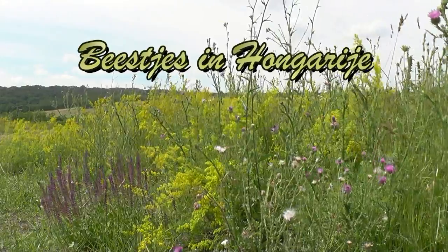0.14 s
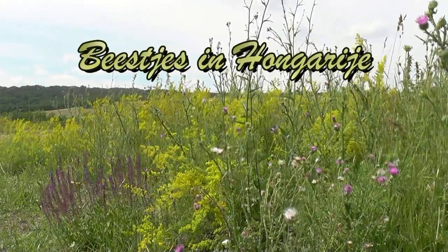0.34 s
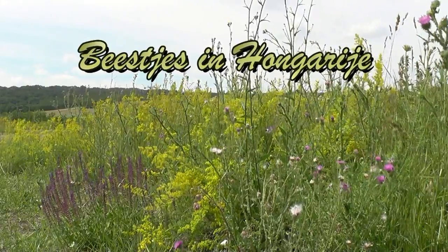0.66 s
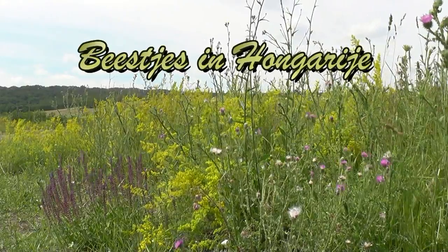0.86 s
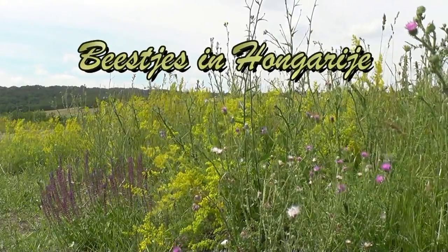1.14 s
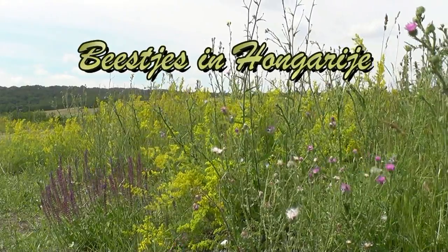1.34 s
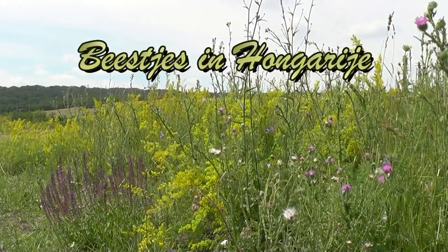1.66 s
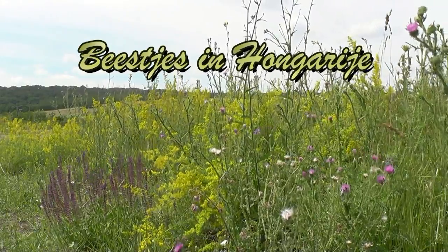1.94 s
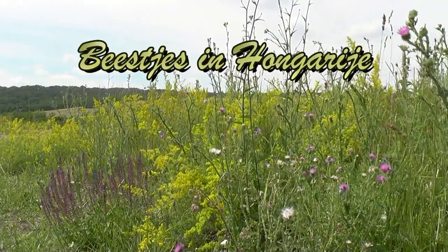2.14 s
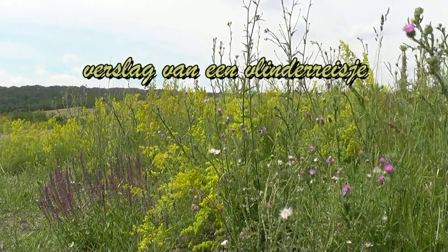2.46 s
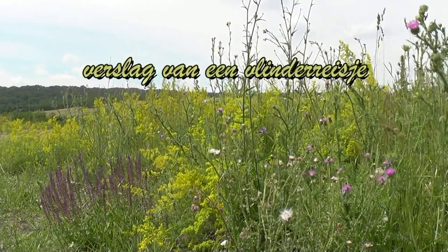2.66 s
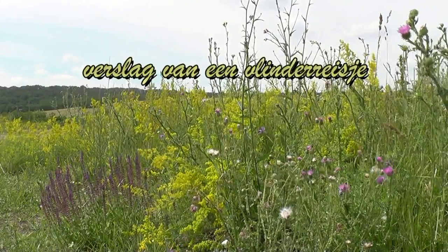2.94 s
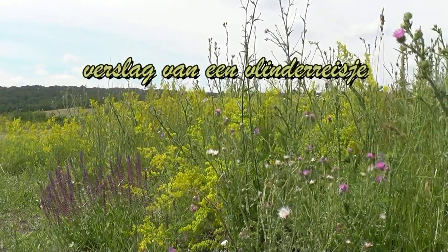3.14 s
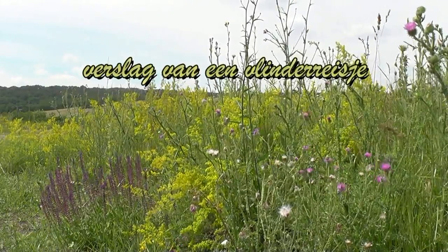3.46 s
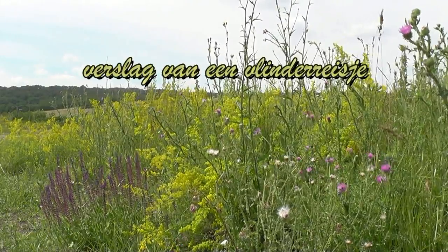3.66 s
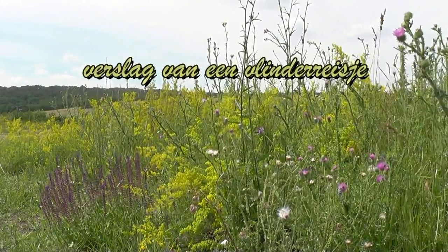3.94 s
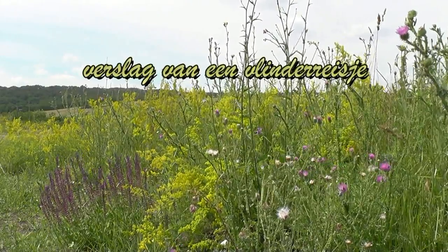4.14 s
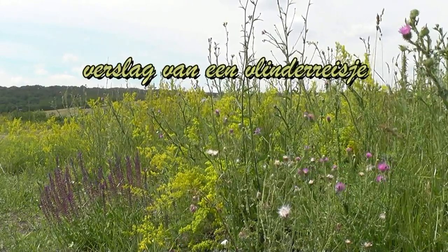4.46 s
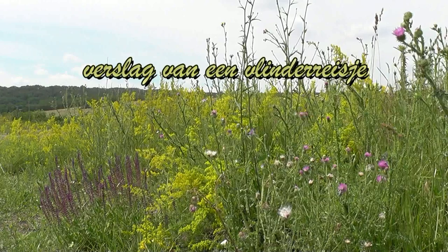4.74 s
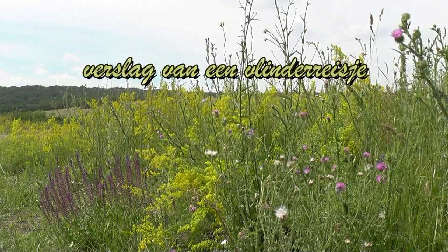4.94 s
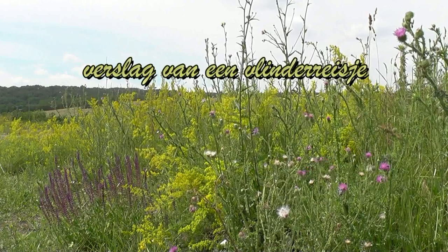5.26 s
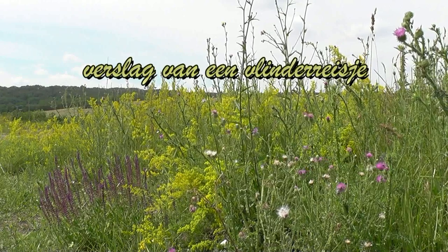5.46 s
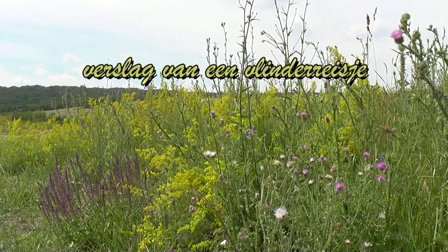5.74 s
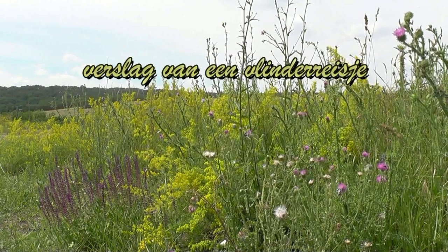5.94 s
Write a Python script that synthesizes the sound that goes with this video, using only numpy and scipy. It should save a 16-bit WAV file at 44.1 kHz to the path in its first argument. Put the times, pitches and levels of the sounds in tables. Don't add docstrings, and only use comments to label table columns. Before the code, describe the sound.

A single frog close by croaks six times in an open meadow, each croak a half-second rattle of round, low-mid pulses with thin reedy breaths between. Far birds whistle, warble and rasp, softened by echoes from trees. A soft airy hush lies underneath. The third croak starts weak and swells; the last is faint as everything fades. Three tiny clicks occur.

```python
import sys
import numpy as np
from scipy import signal
from scipy.io import wavfile
from scipy.ndimage import uniform_filter1d

SR = 44100
rng = np.random.default_rng(int(sys.argv[2]) if len(sys.argv) > 2 else 0)


def transcribe(u):
    v = np.clip(np.atleast_2d(u).T, -1, 1)
    q = np.round(v * 32767).astype(np.int16)
    wavfile.write(sys.argv[1], SR, q)


def volts_from_decibels(level):
    exponent = np.asarray(level, float) / 20
    return 10 ** exponent


N = 268622


def evened(x):
    return x / np.sqrt(np.mean(x ** 2) + 1e-20)


def read(points, hz):
    f, value = np.transpose(points)
    return np.interp(np.log(hz + 1), np.log(f + 1), value)


def add(mix, start_s, sound):
    part = mix[round(start_s * SR):][:len(sound)]
    part += sound[:len(part)]


def wander(seconds):
    size = max(int(seconds * SR), 2)
    noise = rng.standard_normal(N)
    return evened(uniform_filter1d(uniform_filter1d(noise, size), size))


def glide(length_s, start_hz, middle_hz, end_hz):
    u = np.linspace(-1, 1, round(length_s * SR))
    slope = (end_hz - start_hz) / 2
    bend = (start_hz + end_hz) / 2 - middle_hz
    return 2 * np.pi * np.cumsum(middle_hz + u * slope + u ** 2 * bend) / SR


# f/Hz, t60/s
MEADOW_T60 = [(300, 0.96), (700, 1.4), (3000, .8), (8000, 0.46)]


def meadow(x):
    taps = np.zeros(SR)
    slots = np.arange(1500, SR - 20, 20)
    signs = rng.choice([-1., 1.], len(slots))
    taps[slots + rng.integers(0, 20, len(slots))] = signs
    hz, t, z = signal.stft(taps, SR, nperseg=256)
    decay = volts_from_decibels(-60 * t / read(MEADOW_T60, hz)[:, None])
    tail = signal.istft(z * decay, SR, nperseg=256)[1]
    return signal.fftconvolve(x, tail / np.linalg.norm(tail))[:N]


# f/Hz, density/(dB per Hz)
HUSH_SPECTRUM = [(15, -70), (25, -34), (59, -30.5), (129, -32), (194, -26.5), (311, -17.5), (389, -5),
                 (522, -6), (653, -6), (876, -7), (1610, -21), (2360, -20.5), (3380, -18), (4050, -19),
                 (5420, -27.5), (7050, -48), (11900, -120)]
# t/s, 1.3-2.3 kHz level/dB, extra above 5 kHz/dB
HUSH_LEVEL = [(0.0, -63, 3), (1.37, -67, 1), (1.54, -66, 0), (1.78, -67.5, 1), (2.29, -66.5, 1.5),
              (2.42, -66, 3), (3.21, -68, -0.5), (4.14, -68, 3.5), (4.49, -66, 0.5), (4.7, -69.5, 6),
              (4.85, -71, 1.5), (5.21, -73, 1.5), (5.61, -80.5, 8), (5.97, -88, 0), (6.09, -98, 0)]


def hush():
    frames, hz = N // 256 + 5, np.fft.rfftfreq(1024, 1 / SR)
    a, b, patches = rng.standard_normal((frames, 513, 3)).T
    patches = evened(uniform_filter1d(uniform_filter1d(patches, 10, 0), 12, 1))
    frame_s = np.arange(frames) * 256 / SR
    s, db, top_db = np.transpose(HUSH_LEVEL)
    level_db = np.interp(frame_s, s, db)
    top_db = np.interp(frame_s, s, top_db)
    spectrum_db = read(HUSH_SPECTRUM, hz)
    depth_db = read([(80, 6), (300, 2.3), (5000, 3.6), (8000, 3)], hz)
    top_share = read([(4200, 0), (6000, 1)], hz)
    field_db = spectrum_db[:, None] + depth_db[:, None] * patches + top_share[:, None] * top_db
    reference = np.linalg.norm(volts_from_decibels(spectrum_db)[(hz > 1300) & (hz < 2300)])
    z = (a + 1j * b) * volts_from_decibels(field_db + level_db) / reference
    return .61 * signal.istft(z, nperseg=1024, noverlap=768)[1][:N]


# t/s, song centre f/Hz
SONG_PITCH = [(0, 3615), (.5, 3500), (.53, 4200), (.64, 4287), (.7, 3490), (.78, 3109), (.85, 3516),
              (.9, 4077), (.96, 3800), (1.0, 3153), (1.1, 3404), (1.2, 3709), (1.26, 3950), (1.33, 3471),
              (1.42, 3750), (1.5, 3500), (1.53, 3077), (1.64, 3850), (1.69, 3222), (1.81, 3950),
              (1.84, 2944), (1.9, 3250), (2.0, 3090), (2.12, 3600), (2.25, 3090), (2.68, 3193), (2.9, 3600),
              (3.0, 4700), (3.25, 4480), (3.6, 3700), (3.85, 3810), (4.2, 3625), (4.6, 4427), (5.0, 4283),
              (5.3, 3626), (6.09, 4124)]
# t/s, level/dB
SONG_LEVEL = [(0.0, -54.5), (0.1, -57), (0.25, -62.5), (0.42, -65), (0.57, -58), (0.95, -54.5), (1.24, -54),
              (1.36, -56.5), (1.97, -58.5), (2.31, -64), (2.54, -71), (2.93, -67), (3.29, -75), (3.6, -71),
              (3.75, -61), (4.02, -68), (4.39, -69.5), (4.85, -71.5), (5.31, -69.5), (5.53, -79),
              (5.78, -75.5), (5.95, -81.5), (6.09, -89)]


def warbler():
    t = np.arange(N) / SR
    waver = 0.057 * wander(.008) + .04 * wander(0.0013)
    pitch_hz = np.interp(t, *np.transpose(SONG_PITCH)) * (1 + waver)
    syllables = volts_from_decibels(4.1 * wander(0.025))
    song = np.sin(2 * np.pi * np.cumsum(pitch_hz) / SR) * syllables
    heard = evened(song) + .6 * evened(meadow(song))
    level_db = np.interp(t, *np.transpose(SONG_LEVEL)) + 0.5
    return volts_from_decibels(level_db) * evened(heard)


# t/s, length/s, start f/Hz, middle f/Hz, end f/Hz, level/dB
BIRD_NOTES = [(0.134, .05, 3900, 4000, 1800, -60.5), (.18, .07, 3600, 4200, 4400, -61.5),
              (.335, 0.048, 4090, 3640, 3300, -56.5), (.39, .05, 3420, 4150, 2900, -59),
              (0.431, 0.067, 3570, 3430, 3500, -52.5), (0.587, 0.05, 2900, 3020, 3000, -54.5),
              (.73, .03, 2980, 3100, 2600, -52), (.86, 0.031, 3070, 2730, 2750, -56.5),
              (1.0, 0.032, 2930, 2770, 2720, -57.5), (1.13, .04, 3000, 2650, 2600, -51.5),
              (1.26, 0.055, 3054, 2830, 2750, -48), (1.4, 0.04, 3020, 2760, 2720, -50),
              (1.519, 0.053, 2940, 2730, 2720, -48), (1.66, .04, 2940, 2730, 2720, -48.5),
              (1.78, 0.053, 2824, 2750, 2720, -49.5), (1.917, 0.05, 2910, 2700, 2800, -47.5),
              (.79, 0.066, 4480, 4400, 4500, -60.5), (.86, .08, 4150, 4250, 4150, -54),
              (1.18, 0.083, 4050, 4000, 3400, -51.5), (1.36, 0.019, 3400, 3500, 3600, -62),
              (1.79, .05, 4800, 5600, 5150, -73.5), (2.113, .095, 6640, 5200, 4300, -61.5),
              (2.246, 0.11, 6640, 6050, 5300, -66.5), (2.338, 0.041, 3595, 2390, 3400, -52.5),
              (2.229, .05, 1277, 1320, 1200, -57), (2.33, 0.077, 1220, 1140, 920, -61),
              (2.514, .05, 1088, 1120, 1050, -63), (2.761, 0.12, 5330, 4500, 4600, -60.5),
              (2.885, .07, 6300, 7300, 3800, -76), (2.876, 0.052, 3670, 3800, 3800, -62.5),
              (2.982, 0.1, 5220, 4750, 4600, -62), (3.489, 0.035, 5900, 4570, 2400, -58),
              (3.611, 0.049, 5890, 4400, 3850, -58), (3.726, 0.043, 5770, 4700, 3950, -58.5),
              (3.83, 0.027, 5710, 5160, 5500, -58), (3.729, .16, 8100, 8050, 7950, -75),
              (3.953, 0.1, 6400, 6500, 8000, -71.5), (3.96, 0.058, 8000, 7660, 8000, -68),
              (4.036, 0.034, 7840, 7200, 10000, -62.5), (4.119, 0.099, 2490, 2840, 3900, -66),
              (4.202, 0.082, 2440, 3300, 6700, -68), (4.299, .085, 3300, 3050, 2800, -61.5),
              (4.46, .25, 7650, 7600, 7800, -87), (4.775, .012, 5100, 5700, 4100, -67.5),
              (4.755, 0.14, 3500, 3200, 4000, -63.5), (4.778, .1, 7700, 7400, 7100, -82),
              (4.88, .16, 8400, 8350, 8100, -78), (4.91, 0.02, 5300, 5350, 5350, -69.5),
              (4.94, .02, 4770, 4600, 6800, -67), (4.96, .08, 7600, 7200, 6500, -83),
              (5.111, 0.042, 2420, 2700, 6500, -61.5), (5.114, 0.023, 3200, 3300, 3500, -58),
              (5.225, 0.048, 2500, 3200, 4400, -67.5), (5.218, 0.028, 3140, 3800, 7200, -57),
              (5.338, 0.044, 2440, 2800, 4800, -65), (5.338, 0.027, 2880, 4100, 4000, -70),
              (5.4, 0.14, 4210, 4400, 3700, -72.5), (5.456, 0.098, 3500, 3500, 3000, -68),
              (5.604, 0.086, 4150, 4500, 2300, -75.5), (5.64, 0.12, 3400, 3400, 3000, -77.5),
              (5.71, 0.062, 1087, 1160, 1090, -70), (5.799, 0.13, 4050, 4200, 4250, -75),
              (5.91, .05, 3820, 3700, 1800, -76)]
TRILL_TIMES = [5.585, 5.655, 5.726, 5.801, 5.87, 5.94, 6.009]


def bird_notes():
    out = np.zeros(N)
    flicks = [(s, .018, 5600, 5000, 4200, -76 - 14 * (s - TRILL_TIMES[0])) for s in TRILL_TIMES]
    for s, length_s, *hz, db in BIRD_NOTES + flicks:
        phase = glide(length_s, *hz)
        add(out, s, volts_from_decibels(db) * np.sin(phase) * signal.windows.tukey(len(phase), .6))
    return out


# t/s, length/s, low f/Hz, high f/Hz, level/dB
BIRD_RASPS = [(.54, 0.064, 4000, 6350, -64.5), (3.93, .03, 5010, 7340, -80),
              (4.14, 0.039, 4800, 7400, -65.5), (4.22, 0.046, 4740, 7230, -70),
              (4.32, 0.044, 4470, 7300, -66), (4.41, 0.049, 4570, 7300, -75),
              (4.51, 0.065, 4410, 7000, -67.5), (4.59, 0.05, 4260, 6330, -71),
              (5.11, 0.072, 2490, 7600, -66), (5.22, .07, 2466, 7330, -65.5), (5.34, .06, 2526, 7230, -68)]


def bird_rasps():
    out = np.zeros(N)
    for s, length_s, low_hz, high_hz, db in BIRD_RASPS:
        hiss = rng.standard_normal(round(length_s * SR))
        buzz = hiss * (1 + 0.52 * np.sin(glide(length_s, 150, 190, 150)))
        throat = signal.butter(3, [low_hz, high_hz], "bandpass", fs=SR, output="sos")
        rasp = evened(signal.sosfilt(throat, buzz))
        add(out, s, volts_from_decibels(db) * rasp * signal.windows.tukey(len(hiss), .6))
    return out


def birds():
    out = (bird_notes() + bird_rasps()) * volts_from_decibels(2.0 * wander(0.0026))
    return out + volts_from_decibels(-11.5) * meadow(out)


# multiple of pitch, level/dB
REED_ORDERS = [(2, -25.5), (3, 2), (4, 1.5), (5, -19)]


def wheeze(length_s, *hz):
    phase = glide(length_s, *hz)
    reed = sum(volts_from_decibels(db) * np.sin(k * phase + k ** 2) for k, db in REED_ORDERS)
    return reed * signal.windows.tukey(len(phase), .7)


# crest t/s, crest level/dB, crest f/Hz
SAC_PULSES = [(0.1473, -20.0, 568), (0.1826, -18.8, 568), (0.2176, -19.2, 560), (0.2519, -19.8, 556),
              (0.2874, -20.1, 555), (0.323, -19.1, 550), (0.3582, -19.2, 552), (0.3953, -20.3, 548),
              (0.4307, -19.7, 547), (0.4661, -19.8, 547), (0.503, -20.0, 541), (0.5392, -19.2, 549),
              (0.5745, -20.1, 546), (0.6102, -21.0, 538), (0.6458, -20.6, 534), (0.6821, -21.7, 533),
              (0.7141, -29.2, 480), (1.1055, -20.3, 568), (1.1377, -19.2, 578), (1.1705, -19.3, 559),
              (1.2039, -19.7, 560), (1.2372, -19.7, 556), (1.2717, -20.1, 554), (1.3066, -20.3, 554),
              (1.3419, -21.5, 533), (1.3777, -22.0, 540), (1.4141, -22.5, 533), (1.4495, -22.3, 531),
              (1.486, -23.2, 517), (1.5203, -23.6, 512), (1.5563, -23.9, 516), (1.5918, -23.9, 521),
              (1.6265, -24.9, 508), (1.6612, -28.3, 494), (2.2216, -32.5, 465), (2.2571, -30.4, 479),
              (2.2896, -30.1, 480), (2.3239, -29.1, 488), (2.3589, -30.0, 493), (2.3946, -28.6, 488),
              (2.4297, -26.0, 503), (2.4649, -24.6, 512), (2.4998, -23.2, 531), (2.5349, -23.4, 528),
              (2.5705, -23.0, 528), (2.6067, -23.3, 525), (2.6383, -21.8, 533), (2.6757, -22.6, 532),
              (2.7121, -21.9, 539), (2.7484, -22.4, 534), (2.7859, -22.5, 537), (2.824, -23.3, 531),
              (2.8627, -23.0, 535), (2.9001, -23.9, 525), (2.9373, -24.5, 517), (2.9745, -26.0, 514),
              (3.3518, -21.4, 572), (3.3869, -20.0, 576), (3.4213, -20.4, 563), (3.4567, -22.3, 551),
              (3.4927, -22.7, 554), (3.5284, -21.6, 555), (3.5636, -21.5, 554), (3.5996, -21.7, 551),
              (3.6354, -21.6, 558), (3.6714, -22.9, 554), (3.7064, -22.3, 545), (3.7424, -23.6, 548),
              (3.7782, -22.3, 552), (3.8139, -24.4, 541), (3.8491, -23.9, 538), (3.8838, -26.4, 516),
              (4.2804, -21.6, 583), (4.3124, -20.9, 597), (4.3442, -22.1, 563), (4.3776, -21.8, 563),
              (4.4096, -21.2, 556), (4.444, -21.9, 558), (4.4789, -23.9, 545), (4.5144, -23.6, 543),
              (4.5497, -24.6, 527), (4.5852, -26.0, 522), (4.6222, -26.2, 513), (4.6572, -26.3, 508),
              (4.693, -28.4, 500), (4.7279, -28.3, 504), (4.7632, -29.1, 501), (4.7987, -30.0, 507),
              (4.832, -31.9, 492), (5.3937, -42.7, 462), (5.4281, -39.9, 485), (5.4636, -40.0, 476),
              (5.4981, -42.4, 479), (5.5315, -41.6, 485), (5.5684, -39.9, 504), (5.6023, -39.6, 517),
              (5.6378, -40.1, 518), (5.6727, -39.6, 522), (5.7089, -39.4, 533), (5.7447, -39.3, 532),
              (5.7806, -40.5, 528), (5.8164, -41.2, 524), (5.852, -42.1, 526), (5.8899, -42.3, 538),
              (5.9267, -43.8, 537), (5.9633, -45.3, 533), (5.9989, -48.6, 529), (6.0374, -50.2, 529),
              (6.0741, -54.1, 530)]


def croaks(turns):
    rise_s, fall_s = .0059, .0102
    arch_s, arch_late_s = .0092, .0016
    out, t = np.zeros(N), np.arange(-3 * rise_s, 3 * fall_s, 1 / SR)
    shape = np.exp(-np.where(t < 0, t / rise_s, t / fall_s) ** 2)
    sag = 1 - np.exp(-((t - arch_late_s) / arch_s) ** 2)
    for (s, db, hz), turn in zip(SAC_PULSES, turns):
        pitch_hz = hz - max(81 + 1.5 * (hz - 530), 0) * sag
        cycles = np.cumsum(pitch_hz) / SR + turn
        add(out, s + t[0], volts_from_decibels(db) * shape * np.sin(2 * np.pi * cycles))
    return out


# t/s, length/s, start f/Hz, middle f/Hz, end f/Hz, level/dB
SAC_WHEEZES = [
    (0.111, 0.058, 151.5, 164, 204, -42),
    (1.071, 0.033, 145, 152, 110, -46),
    (1.68, 0.028, 154, 140, 170, -47.5),
    (2.176, 0.062, 152, 173, 152, -54.5),
    (3.011, 0.16, 204.8, 206.5, 179, -49),
    (3.303, 0.048, 150, 156, 250, -52),
    (4.24, 0.057, 153.3, 153, 200, -45.5),
    (4.848, 0.029, 148, 142, 140, -48.5),
    (5.362, 0.042, 153, 155, 144, -57),
]


def breaths(slips, pushes):
    out = np.zeros(N)
    breath_hz, over_hush_db = 157.34, 22.5
    fade = np.transpose(HUSH_LEVEL)[:2]
    for (s, _, _), slip, push in zip(SAC_PULSES, slips, pushes):
        hz = breath_hz * (1 + .08 * (slip - .5))
        level_db = np.interp(s, *fade) + over_hush_db + 5 * (push - .5)
        add(out, s - .024, volts_from_decibels(level_db) * wheeze(.022, 0.957 * hz, hz, 1.08 * hz))
    for s, length_s, *hz, db in SAC_WHEEZES:
        add(out, s, volts_from_decibels(db) * wheeze(length_s, *hz))
    return out


# delay t/s, gain
GROUND_ECHOES = [(.0066, .24), (.0100, .2), (.0158, -.075)]


def frog():
    turns, slips, pushes = rng.random((len(SAC_PULSES), 3)).T
    out = croaks(turns) + breaths(slips, pushes)
    echoed = out.copy()
    for delay_s, gain in GROUND_ECHOES:
        add(echoed, delay_s, gain * out)
    return echoed + volts_from_decibels(-24) * meadow(out)


def scene():
    return (frog() + birds() + warbler() + hush())[None]


def low_pass(x):
    return signal.sosfilt(signal.butter(12, 15750, fs=SR, output="sos"), x)


# t/s, jump level/dB
SAMPLE_DROPOUTS = [
    (.127, -44),
    (2.6218, -36.5),
    (5.119, -63.5),
]


def record(dry):
    jumps = np.zeros(N)
    settle_s = 0.00064
    for s, db in SAMPLE_DROPOUTS:
        add(jumps, s, volts_from_decibels(db) * np.exp(-np.arange(2000) / SR / settle_s))
    return low_pass(dry + jumps)


dry = scene()
out = record(dry)
transcribe(out)
```